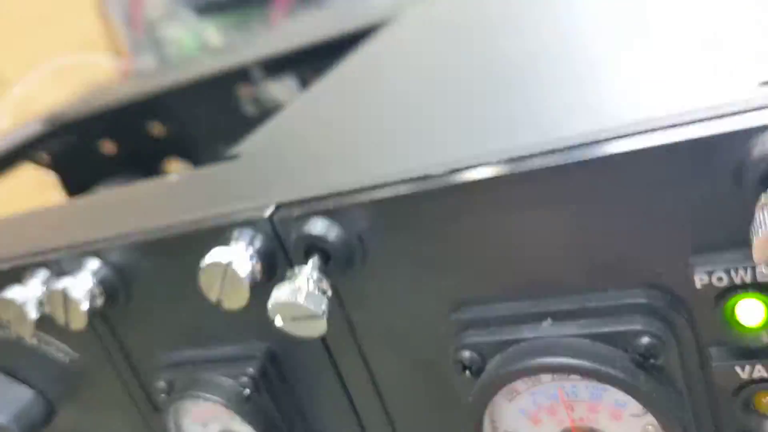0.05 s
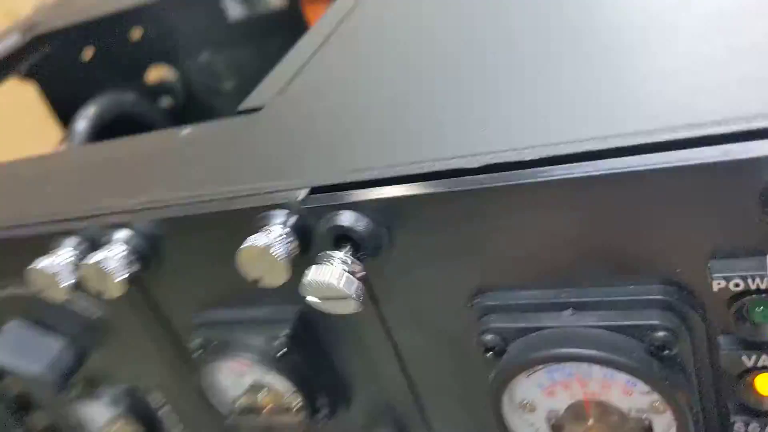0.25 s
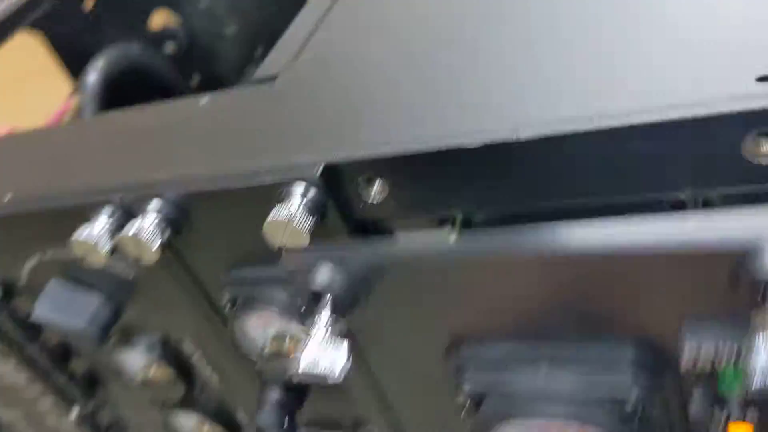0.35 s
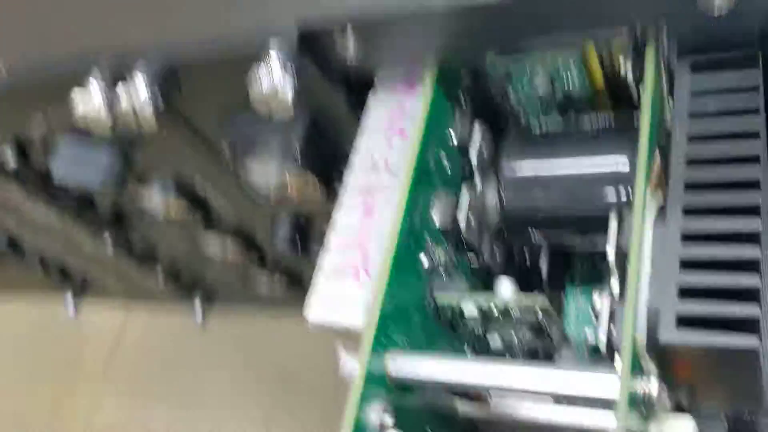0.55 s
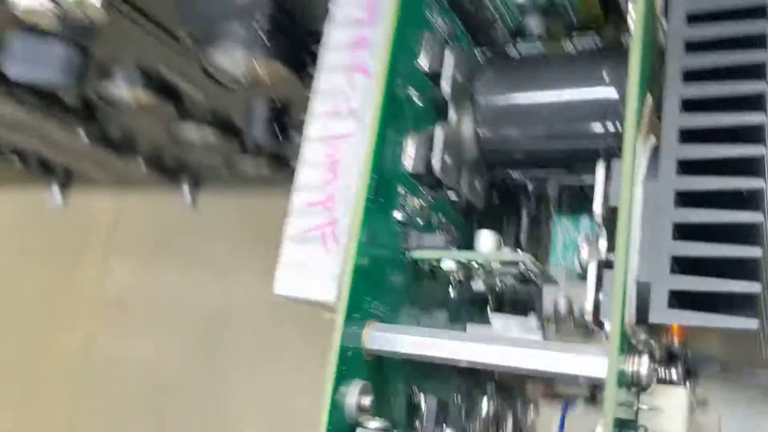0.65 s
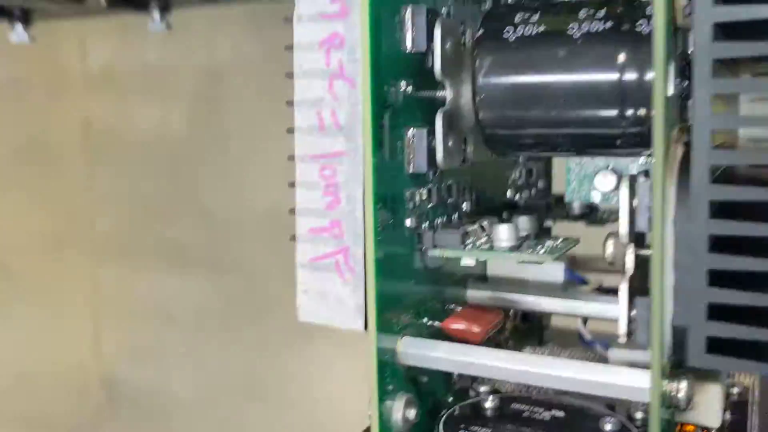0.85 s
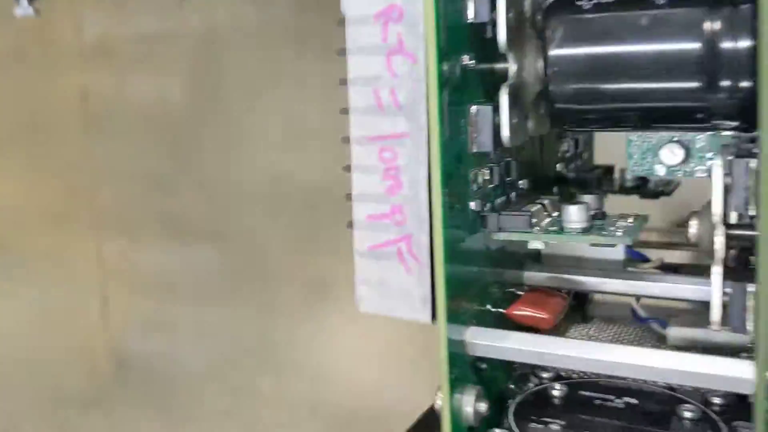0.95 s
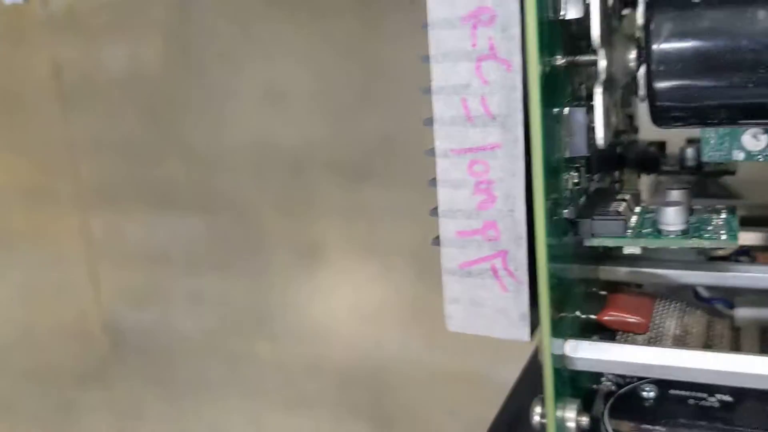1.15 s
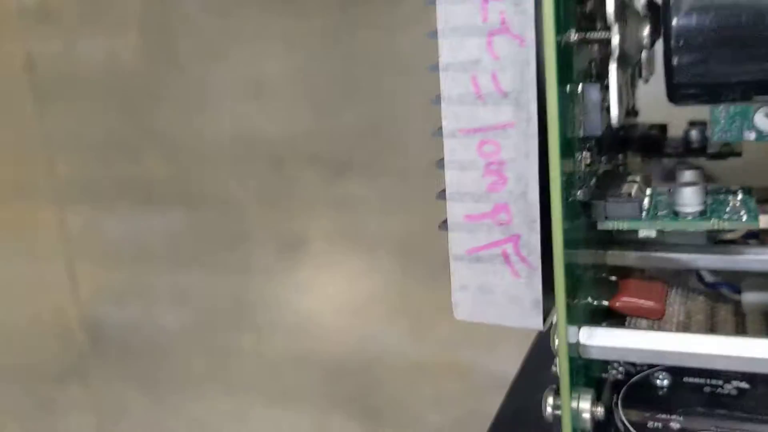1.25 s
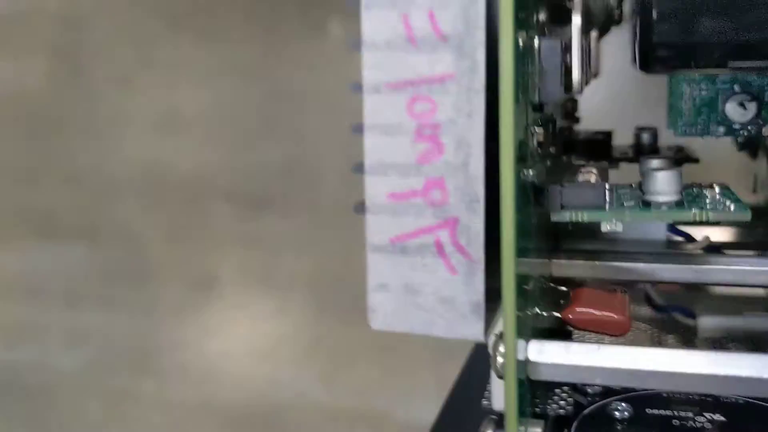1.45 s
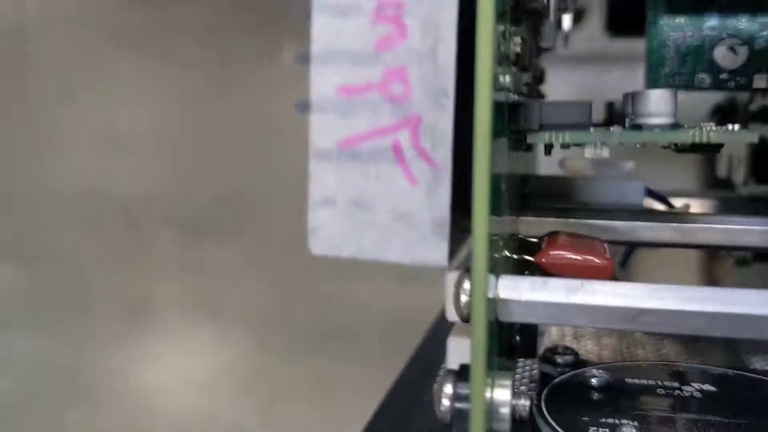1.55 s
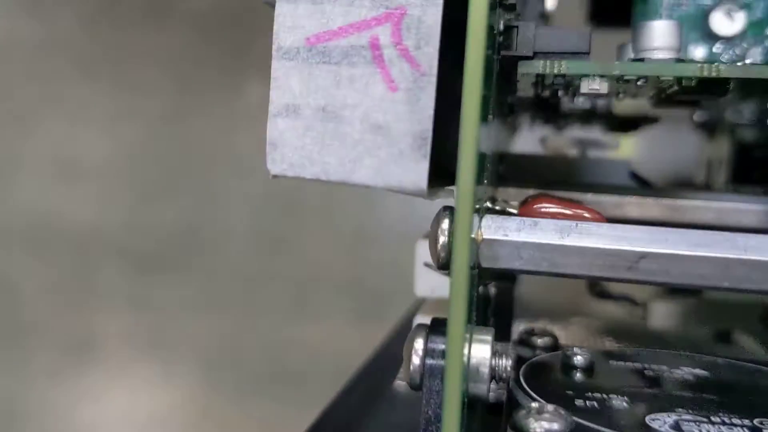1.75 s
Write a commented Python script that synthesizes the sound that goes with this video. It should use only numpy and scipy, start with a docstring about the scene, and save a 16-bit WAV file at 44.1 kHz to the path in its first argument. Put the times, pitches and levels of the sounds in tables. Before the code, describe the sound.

Close to an open amplifier, a breaker clacks loudly, ringing its metal parts and rattling the case. A rush of hiss dies away with two dull knocks and a short scrape, leaving a steady fan drone, buzz and thin whine.

```python
"""A fan drones under the hum, buzz and whine of the mains; a stereo pair stands beside an open amplifier.
Out of a soft midrange noise a heavy switch trips: two latch ticks, a clattering clack, two sharp stops.
Its metal parts ring, the cabinet booms, loose parts rattle, and two dull knocks follow.
A hissing rush starts with the clack and fades, ending in a rising scrape at one second."""
import sys
import numpy as np
from scipy import signal
from scipy.fft import rfft, irfft
from scipy.io import wavfile

SR = 44100
rng = np.random.default_rng(int(sys.argv[2]) if len(sys.argv) > 2 else 0)


def unload_wav(signal):
    """Save mono or channel-first audio to the path in sys.argv[1] as 16-bit WAV at rate SR, clipped to [-1, 1]."""
    wavfile.write(
        sys.argv[1],
        SR,
        np.round(np.clip(np.atleast_2d(signal).T, -1, 1) * 32767).astype(np.int16),
    )


N = 79380
TIME = np.arange(N) / SR
FREQ = np.maximum(np.fft.rfftfreq(N, 1 / SR), 1)
BUZZ_HZ, TOP_HZ = 120, 15900  # the supply buzzes at twice the mains frequency
BLOW_LIKENESS, RUSH_PAN_DB = 0.31, -4.5

# Buzz partials that stand out as a whine. Each row: pitch in Hz, peak level in dB,
# time of one peak in seconds, seconds between peaks.
WHINE_PARTIALS = [(720, -71, 1.75, 1.7), (1080, -68, 1.3, 1.3), (1320, -60, 1.25, .9),
                  (1560, -63, 1.85, .9), (3000, -60, 1.8, 1.5), (3120, -52.5, 1.38, .85),
                  (3600, -61, 1.8, 2.2), (4560, -60.5, 1.65, 1.6), (4800, -62, 1.5, 1.1),
                  (11040, -70, 1.17, .62)]


def undb(db):
    """Decibels to gain."""
    return 10 ** (np.asarray(db) / 20)


def curve(table):
    """Gain over time from (seconds, dB) points."""
    seconds, db = np.array(table).T
    return undb(np.interp(TIME, seconds, db))


def colour(table, hz=FREQ):
    """Gain at these frequencies from (Hz, dB) points."""
    points_hz, db = np.array(table).T
    return undb(np.interp(np.log(hz), np.log(points_hz), db))


def resonances(modes):
    """Gain per frequency of a body with these (Hz, width in Hz, dB) resonances."""
    return np.sqrt(sum(undb(db) ** 2 / (1 + ((FREQ ** 2 - hz ** 2) / (FREQ * width)) ** 2) ** 2
                       for hz, width, db in modes))


def shaped(x, gain):
    """Filter by a gain per frequency, keeping the power of white noise."""
    return irfft(rfft(x) * gain / np.sqrt(np.mean(gain ** 2)), N)


def pair(likeness):
    """White noise at two microphones; likeness is the share of power they have in common."""
    return np.sqrt(likeness) * rng.standard_normal(N) + np.sqrt(1 - likeness) * rng.standard_normal((2, N))


def pan(db):
    """Microphone gains for a level difference, left minus right."""
    return undb(np.array([[db], [-db]]) / 2)


def placed(x):
    """Low knocks reach both microphones in step; the balance changes with frequency."""
    # Lean across the pair. Each row: frequency in Hz, left minus right in dB.
    balance = [(700, 1), (1300, -5.5), (3000, -1.5), (8500, -7.5), (14000, 1)]
    left, right = rfft(x)
    mid = (left + right) / 2
    side = (left - right) / 2 * np.minimum(FREQ / 1280, 1)
    lean = np.sqrt(colour(balance))
    return irfft(np.array([(mid + side) * lean, (mid - side) / lean]), N)


def walk(rate_hz):
    """Smooth random drift with a spread of 1."""
    drift = irfft(rfft(rng.standard_normal(N)) * np.exp(-(FREQ / rate_hz) ** 2) * (FREQ > 1), N)
    return drift / (drift.std() + 1e-18)


def decay(start, t60, contact_s=0.0003):
    """Envelope of a blow: a quick contact, then a fall of 60 dB in t60 seconds."""
    age = np.maximum(TIME - start, 0)
    return (1 - np.exp(-age / contact_s)) * np.exp(-np.log(1000) * age / t60)


def fan(air_db=-55.5):
    """A wavering drone over a bed of moving air, whose bass is alike at both microphones."""
    # Tones of the fan. Each row: pitch in Hz, level in dB, waver in dB.
    tones = [(75.35, -46.5, 0), (151, -58.5, 8)]
    # Colour of the air. Each row: frequency in Hz, relative level in dB.
    air_colour = [(25, -26), (48, 10), (100, -3.5), (200, -1.5), (450, -16.5), (900, -21.5), (2200, -21.5),
                  (11000, -26.5), (12500, -27.5)]
    drone = 0
    for hz, db, waver_db in tones:
        level = np.sqrt(2) * undb(db + waver_db * walk(rate_hz=1.8))
        drone = drone + level * np.sin(2 * np.pi * hz * TIME + 0.53 * walk(rate_hz=4.1))
    mid, side = shaped(rng.standard_normal((2, N)), colour(air_colour))
    side = irfft(rfft(side) * np.minimum(FREQ / 566, 1), N)
    return drone * pan(db=-2.1) + undb(air_db) * np.array([mid + side, mid - side])


def supply(waver_db=2.8, wavers_per_s=3, wide_hz=900):
    """Mains hum and buzz; uneven partials waver as the microphones move, the high ones apart per side."""
    # Outline of the partials. Each row: frequency in Hz, level in dB.
    outline = [(120, -63), (240, -47.5), (360, -62.5), (480, -73.5), (900, -80), (1500, -69.5),
               (2100, -79.5), (3200, -67.5), (3900, -72.5), (4700, -69.5), (7000, -83), (11100, -70.5),
               (12000, -88)]
    # Swell of the buzz's treble. Each row: time in seconds, gain in dB.
    treble_swell = [(.1, 2), (1.15, 1), (1.42, 2), (1.6, -0.5)]
    out, swell = 0, curve(treble_swell)
    knots = np.arange(0, TIME[-1] + 1, 1 / wavers_per_s)
    whining = [row[0] for row in WHINE_PARTIALS]
    for hz in np.setdiff1d(np.arange(BUZZ_HZ, TOP_HZ, BUZZ_HZ), whining):
        wide = min(hz / wide_hz, 1) ** 2
        phase = rng.uniform(0, 2 * np.pi) + wide * rng.uniform(-np.pi, np.pi, (2, 1))
        scatter = rng.standard_normal() + rng.standard_normal((2, len(knots)))
        levels = undb(waver_db * np.sqrt(wide) * scatter)
        waver = np.array([np.interp(TIME, knots, side) for side in levels]) * (1 + wide * (swell - 1))
        out = out + colour(outline, hz) * waver * np.sin(2 * np.pi * hz * TIME + phase)
    return out


def whine(dip_db=10):
    """Strong buzz partials swell and sink as the microphones move through their standing waves."""
    out = 0
    for hz, db, loudest, period in WHINE_PARTIALS:
        level = undb(db - dip_db * np.sin(np.pi * (TIME - loudest) / period) ** 2)
        phase = rng.uniform(0, 2 * np.pi) + rng.uniform(-2.9, 1, (2, 1))
        out = out + level * np.sin(2 * np.pi * hz * TIME + phase)
    return out * pan(db=-1)


def early_noise():
    """A soft midrange noise before the clack."""
    # Its fade. Each row: time in seconds, level in dB.
    fade = [(.12, -54), (.4, -100)]
    return shaped(pair(BLOW_LIKENESS), resonances([(1070, 4300, 0)])) * curve(fade)


def switch(metal_db=-24.5, ring_build_s=0.031, tail_db=-53):
    """Each blow is a dense crack with a soft tail, and sets the metal parts ringing."""
    # Blows of the switch. Each row: start in seconds, level in dB, then knock, treble and
    # top-treble tone in dB, t60 in seconds.
    blows = [(0.1424, -21, 5, -16, -14, 0.011), (0.188, -31, 0.5, -5, -5, 0.041),
             (0.2142, -17, 1, -7, -7, 0.081), (0.2202, -8, 13, 14, -6, 0.026),
             (0.227, -15.5, -4, 16, 20, 0.064), (0.2348, -17.5, -8, 6.5, 0, 0.11),
             (0.2582, -10, -3.5, -2, 13, 0.037), (0.2611, -13.5, -5.5, 2, -0.5, 0.074),
             (0.3344, -13.5, -5, -4, -13, 0.035), (0.3537, -9, -7.5, -1, -11.5, 0.031),
             (0.3902, -19, -9.5, -15, -32, 0.037)]
    # Colour common to all cracks. Each row: frequency in Hz, relative level in dB.
    crack_colour = [(100, -38), (400, -9.5), (640, 8), (850, 4), (1200, 0), (1900, -3), (3500, 0),
                    (6500, -5.5), (9000, -4.5), (13000, -3), (16000, -7.5)]
    # Modes of the metal parts. Each row: pitch in Hz, relative level in dB, t60 in seconds.
    metal_modes = [(590, 0, .14), (650, 5, .12), (1030, 8, .07), (1275, 0, .15), (2400, -1, .14),
                   (3338, 2, .18), (3553, 2, .18), (5925, -3, .18), (8030, -4, .15), (9644, -7, .15),
                   (12173, -2, .12), (13725, -1, .08)]
    out = 0
    for start, db, knock_db, treble_db, top_db, t60 in blows:
        tone = [(1100, knock_db), (2400, 0.0059), (7000, treble_db), (13000, top_db)]
        burst = pair(BLOW_LIKENESS) * (decay(start, t60) + undb(tail_db) * decay(start, t60=0.37))
        crack = shaped(burst, colour(crack_colour) * colour(tone))
        metal = 0
        for hz, mode_db, ring_s in metal_modes:
            ring = np.sin(2 * np.pi * hz * TIME + rng.uniform(0, 2 * np.pi, (2, 1)))
            metal = metal + undb(mode_db) * colour(tone, hz) * decay(start, ring_s) * ring
        build = min(t60 / ring_build_s, 1) ** 2  # the shortest blows ring less
        out = out + undb(db) * (crack + undb(metal_db) * build * metal)
    return placed(out)


def cabinet():
    """The panels boom and thump, a little to the right, while loose parts chatter against them."""
    # Course of the boom. Each row: time in seconds, level in dB.
    boom_level = [(.2, -40.5), (.31, -28.5), (.44, -33), (.5, -40.5), (.78, -46), (1.1, -54.5)]
    # Colour of the boom. Each row: frequency in Hz, relative level in dB.
    boom_colour = [(30, -52), (70, -14.5), (115, -14.5), (160, -1.5), (195, -4.5), (330, -15.5), (450, -27),
                   (900, -97)]
    # Panel thumps. Each row: centre in seconds, pitch in Hz, level in dB, half length in seconds.
    thumps = [(.395, 193.2, -27, 0.068), (0.403, 81.3, -27, 0.0145)]
    boom = shaped(pair(likeness=0.74), colour(boom_colour)) * curve(boom_level)
    thump = sum(undb(db) * np.exp(-((TIME - at) / half) ** 2) * np.sin(2 * np.pi * hz * (TIME - at))
                for at, hz, db, half in thumps)
    return ((boom + thump) * pan(db=-2.5) + rattle()) * (TIME > boom_level[0][0])


def rattle(taps_per_s=800, scatter_db=2):
    """Loose parts tap at random, each tap a short burst through their resonances."""
    # Course of the rattle. Each row: time in seconds, level in dB.
    level = [(.212, -66), (.225, -26), (.275, -29), (.35, -23), (.43, -42), (.95, -59.5), (1.05, -100)]
    # Resonances of the parts. Each row: centre in Hz, width in Hz, relative level in dB.
    modes = [(628, 88, 1.5), (712, 186, -3.5), (1250, 270, -7), (1670, 1800, -11.5)]
    hits = rng.random(N) < taps_per_s / SR
    taps = hits * undb(scatter_db * rng.standard_normal(N)) * rng.choice([-1, 1], N)
    burst = pair(BLOW_LIKENESS) * decay(0, t60=0.026)
    chatter = irfft(rfft(taps) * rfft(burst), N)
    return placed(shaped(chatter / chatter.std(), resonances(modes)) * curve(level))


def rush(flutter_db=1.2):
    """A bright, wide hiss on the right starts with the clack, swells and dies away."""
    # Course of the rush. Each row: time in seconds, level in dB.
    level = [(.22, -52), (.29, -45.5), (.385, -32), (.6, -35), (.68, -41.5), (.82, -43), (.98, -55),
             (1.05, -85)]
    # Colour of the hiss. Each row: frequency in Hz, relative level in dB.
    hiss_colour = [(400, -3), (900, -8), (1500, 1.5), (5500, 2), (8000, 0.5), (12000, 2.5), (16000, -7)]
    hiss = shaped(pair(likeness=0.049), colour(hiss_colour)) * curve(level)
    return hiss * undb(flutter_db * walk(rate_hz=33)) * (TIME > level[0][0]) * pan(RUSH_PAN_DB)


def knocks(body_hz=510, width_hz=270):
    """Two dull knocks on the cabinet after the clatter."""
    # The knocks. Each row: start in seconds, level in dB.
    hits = [(0.56, -35), (.798, -48.5)]
    body = shaped(pair(BLOW_LIKENESS), resonances([(body_hz, width_hz, 0)]))
    return placed(body * sum(undb(db) * decay(at, t60=0.16) for at, db in hits))


def scrape(peak_s=0.94, rise_oct_per_s=1.6, flutter_db=1.2):
    """Rough friction rings three resonances that rise together and stop with the rush."""
    # Course of the scrape. Each row: time in seconds, level in dB.
    level = [(.6, -76), (.86, -49.5), (.94, -42), (.985, -45), (1.06, -74)]
    # Its resonances. Each row: centre at the peak in Hz, half width in Hz, relative level in dB.
    modes = [(1307, 350, -3), (2250, 720, -8), (4520, 2200, -7)]
    glide_time = np.cumsum(2 ** (rise_oct_per_s * (TIME - peak_s))) / SR
    out = 0
    for hz, width, db in modes:
        rough = signal.hilbert(shaped(pair(BLOW_LIKENESS), resonances([(hz, 2 * width, 0)])))
        pitch_shift = np.exp(2j * np.pi * hz * (glide_time - TIME))
        out = out + undb(db) * (rough * pitch_shift).real
    return out * curve(level) * undb(flutter_db * walk(rate_hz=110)) * pan(RUSH_PAN_DB)


def scene():
    """All sources at the two microphones beside the amplifier."""
    trip = switch() + cabinet() + knocks() + rush() + scrape()
    return trip + supply() + whine() + fan() + early_noise()


def record(dry):
    """The recorder rounds the highest peaks and cuts the top."""
    rounded = dry / (1 + (dry / .85) ** 4) ** .25
    return signal.sosfilt(signal.ellip(10, .2, 80, TOP_HZ, fs=SR, output="sos"), rounded)


dry = scene()
out = record(dry)
unload_wav(out)
```